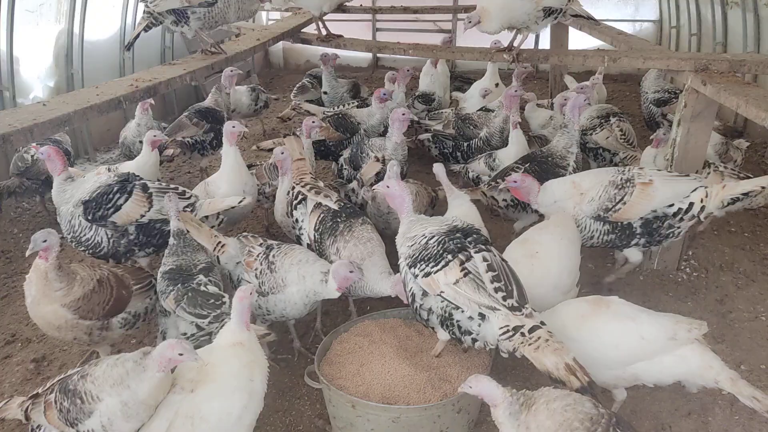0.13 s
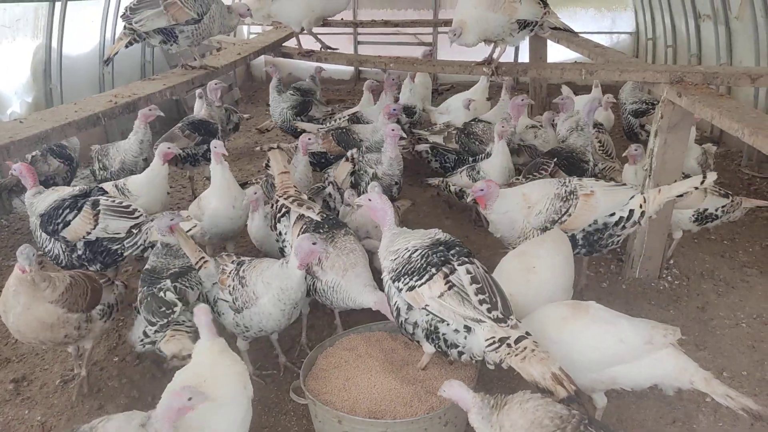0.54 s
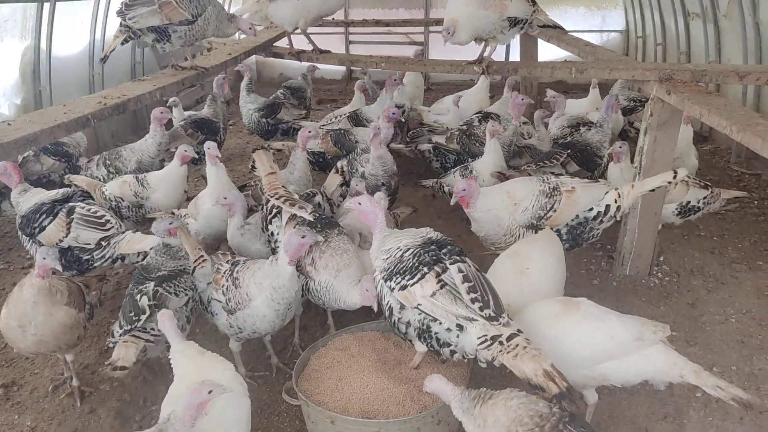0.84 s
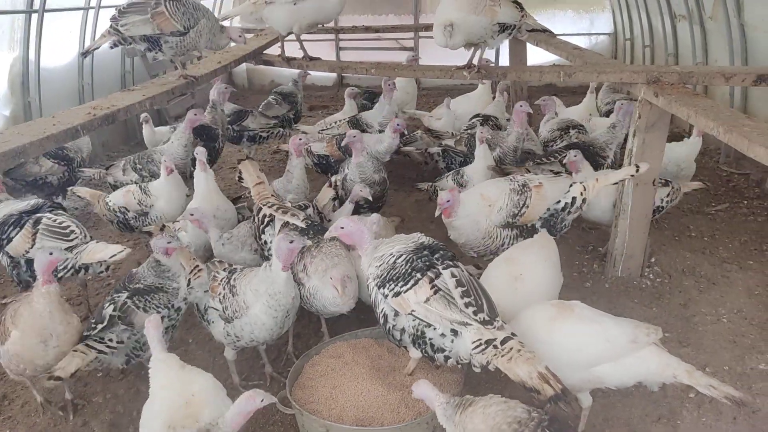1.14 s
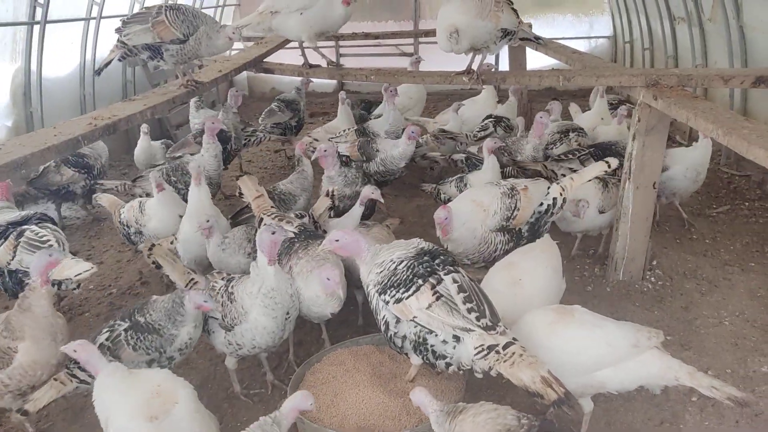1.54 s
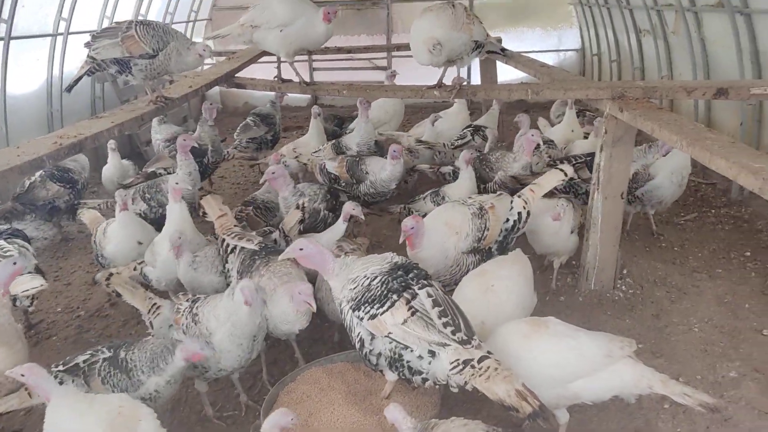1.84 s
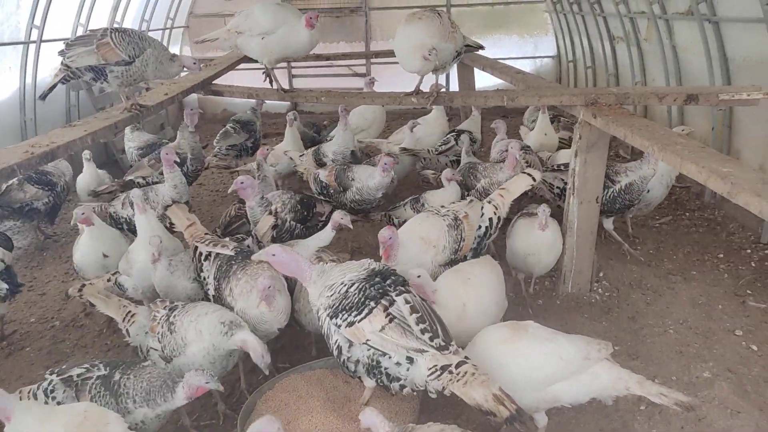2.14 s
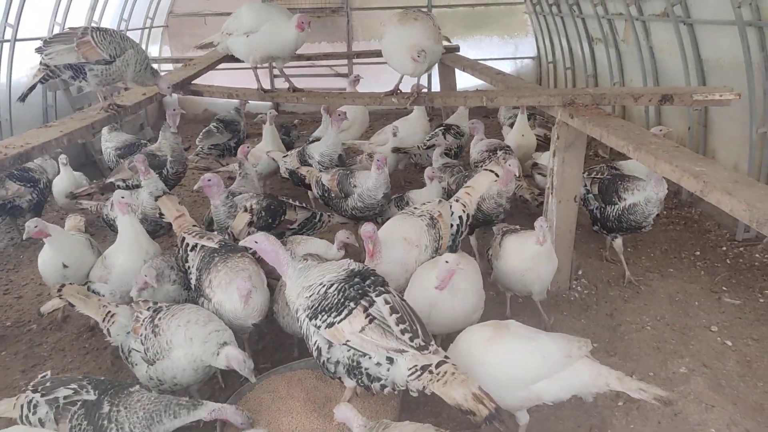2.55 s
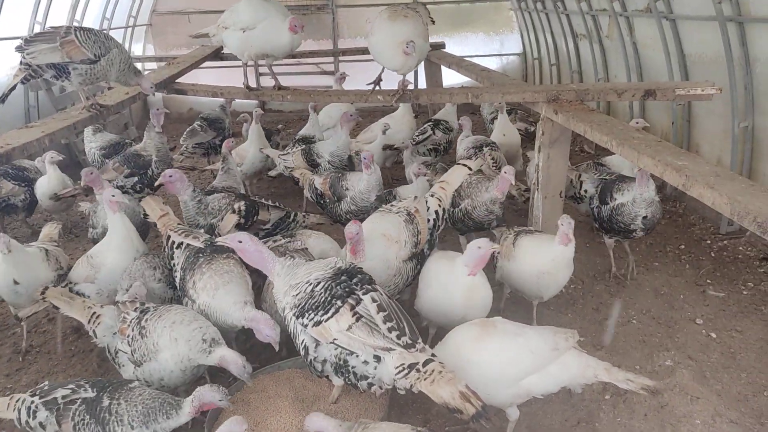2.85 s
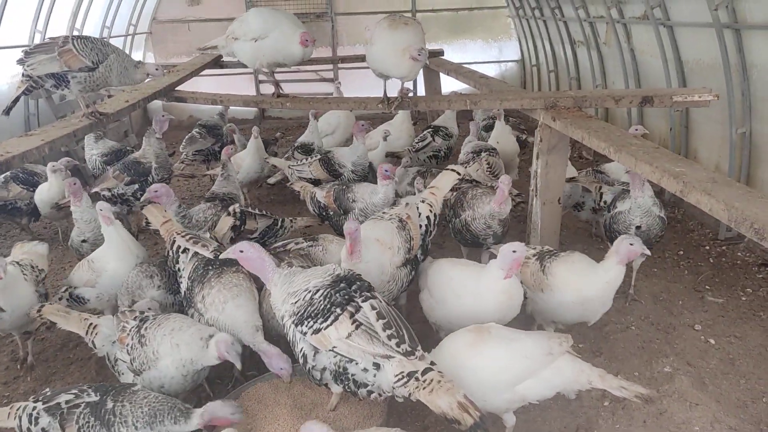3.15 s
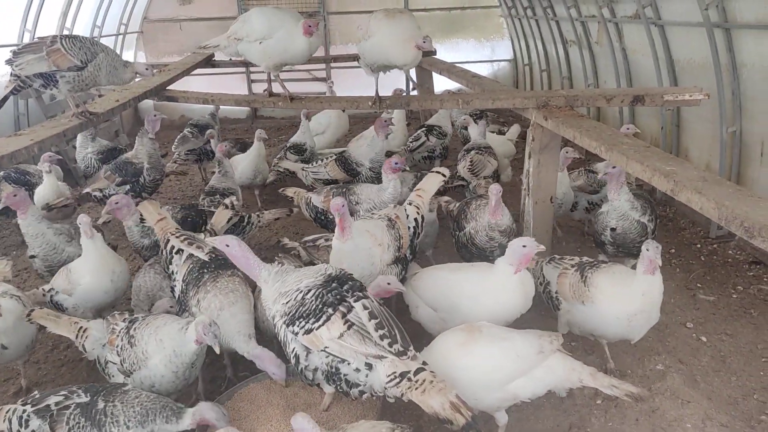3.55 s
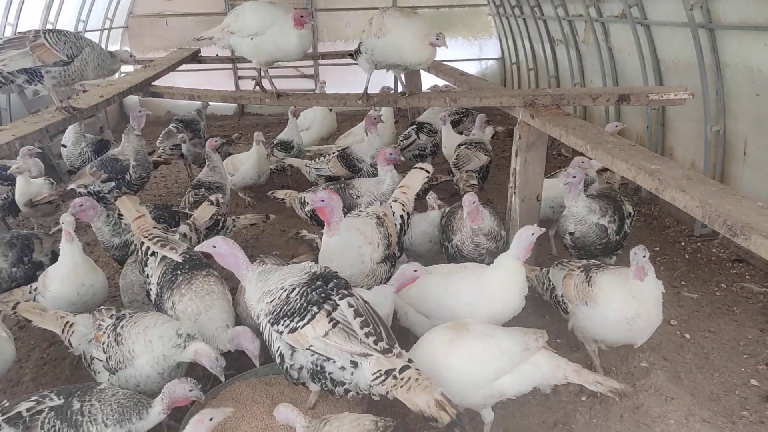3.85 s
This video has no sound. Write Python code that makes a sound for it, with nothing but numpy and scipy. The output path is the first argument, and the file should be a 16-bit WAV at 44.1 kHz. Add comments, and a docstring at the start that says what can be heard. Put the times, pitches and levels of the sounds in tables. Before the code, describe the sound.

A turkey flock calls in clustered, whistle-like hoarse yelps, thinning briefly and then bursting loudly again, over gritty scuffing and faint shuffling in a dirt-floored shed, with later wind thumps on a handheld stereo microphone.

```python
"""Many short overlapping turkey yelps, near and far, in a dirt-floored shed, over feet scuffing the dirt.
Yelps are near-sine glides with six partials; the far flock is a chance crowd of them. Scuffs are swells of
dense grit clicks and the shuffle is patchy noise. Gusts of lumpy low noise and single pushes buffet the two
microphone ports in the second half. The shed echoes birds and scuffs; the right port rings near 8.5 kHz."""
import sys
import numpy as np
from scipy import signal
from scipy.fft import rfft, irfft, next_fast_len
from scipy.io import wavfile

SR = 44100
rng = np.random.default_rng(int(sys.argv[2]) if len(sys.argv) > 2 else 0)


def wrap_up_sound(samples):
    """Save the sound to the file named by the first command line argument, as 16-bit audio."""
    columns = np.atleast_2d(samples).T
    # keep every value between -1 and 1, then stretch to whole-number steps
    tamed = np.clip(columns, -1, 1)
    steps = np.round(tamed * 32767).astype(np.int16)
    wavfile.write(sys.argv[1], SR, steps)


N = 176400   # samples, 4 s


def from_db(db):
    """dB to gain."""
    return 10 ** (np.asarray(db) / 20)


def rms_one(x):
    """Scale to rms 1, over both sides together."""
    return x / np.sqrt(np.mean(x ** 2) + 1e-20)


def in_time(rows):
    """Columns of a breakpoint curve at every sample; the first column is seconds."""
    s, *columns = np.transpose(rows)
    return [np.interp(np.arange(N) / SR, s, c) for c in columns]


def drift(rate_hz):
    """Chance wander of rms 1: white noise through a double one-pole low-pass."""
    r = np.exp(-2 * np.pi * rate_hz / SR)
    wander = signal.lfilter([1], [1, -2 * r, r * r], rng.standard_normal(N + SR))
    return rms_one(wander[SR:])   # the first second lets the filter settle


def colour(x, points):
    """Shape a noise by a spectrum drawn in dB on a log-frequency axis."""
    hz, db = np.transpose(points)
    f = np.maximum(np.arange(N // 2 + 1) * SR / N, 1)
    gain = from_db(np.interp(np.log(f), np.log(hz), db))
    return irfft(rfft(x) * gain, N)


def low(x, hz):
    """Two-pole low-pass."""
    return signal.sosfilt(signal.butter(2, hz, fs=SR, output="sos"), x)


def shuffle():
    """Steady shuffle of the shed: broad patchy noise, shared by both sides in the bass only."""
    # Each row: frequency in Hz, relative level in dB per Hz.
    shuffle_spectrum = [(85, -12), (140, -4.5), (300, -8), (1500, -19.5), (3500, -11.5), (7000, -12.5),
                        (12000, -18), (15000, -16.5)]
    level_db, patch_db, patch_hz = -56, 2.5, 11.0
    white = rng.standard_normal((2, N))
    shared_bass = white + low(white[::-1], 670)
    patches = from_db(level_db + patch_db * drift(patch_hz))
    return patches * rms_one(colour(shared_bass, shuffle_spectrum))


def wind():
    """Wind on the ports: lumpy low noise, mostly each port's own, and single pushes on the right."""
    # Each row: time in seconds, relative level in dB, left over right in dB.
    gusts = [(0, -65.5, -1.5), (1.9, -61, 0.5), (2.1, -55.5, -5), (2.25, -55, -16), (2.32, -60, -2),
             (2.45, -38.5, 30), (2.55, -28, 12.5), (2.68, -35, 4), (2.72, -25, -5.5), (2.78, -40, 4),
             (2.92, -45, -13), (3.05, -34, -28), (3.18, -43, -6), (3.26, -51.5, 4), (3.6, -50.5, -8),
             (3.65, -34.5, -34.5), (3.83, -44.5, 1), (3.9, -35, -23), (4.0, -50.5, 2)]
    # Sharp pushes on the right port. Each row: time in seconds, size in dB before the dip, width in seconds.
    puffs = [(2.728, -9.5, 0.0069), (2.870, -14.5, 0.0043), (3.047, -20.5, 0.0041), (3.364, -18.5, 0.0054),
             (3.653, -15, 0.0032), (3.868, -20, 0.0094)]
    body_hz, lump_db, edge_hz, edge_db = 73.6, 5, 252, -13.5
    lumps = from_db(lump_db * np.array([drift(23), drift(33.7)]))
    white = rng.standard_normal((2, N)) * lumps
    white = white + 0.27 * white[::-1]   # a little of each port in the other
    body = rms_one(low(low(white, body_hz), edge_hz))
    edge = rms_one(low(low(white, edge_hz), edge_hz))
    high_pass = signal.butter(2, 22.0, "high", fs=SR, output="sos")
    rumble = signal.sosfilt(high_pass, body + from_db(edge_db) * edge)

    db, pan_db = in_time(gusts)
    # panning keeps the summed power of the two ports
    pan_gain = 2 / (1 + from_db([-pan_db, pan_db]) ** 2) ** .5
    out = rumble * from_db(db) * pan_gain
    t = np.arange(N) / SR
    for s, push_db, width in puffs:
        z = ((t - s) / width * 2) ** 2
        # a push inside a wider, shallower dip of opposite sign
        out[1] += from_db(push_db) * (np.exp(-z) - 0.29 * np.exp(-z / 9))
    return out


def shed(x):
    """Echo of the shed: ten feedback delays a side that lose treble each pass, smeared by two allpasses."""
    t60_s, dull_hz = 0.24, 3780   # decay in the bass; low-pass inside each loop
    size = next_fast_len(N + SR)
    w = 2 * np.pi * np.arange(size // 2 + 1) / size   # radians per sample
    dull = 1 / (1 + 1j * w * SR / (2 * np.pi * dull_hz))
    response = np.zeros((2, size // 2 + 1), complex)
    for k, lag_s in enumerate(rng.uniform(.008, 0.027, size=20)):
        loop = from_db(-60 * lag_s / t60_s) * dull * np.exp(-1j * w * int(lag_s * SR))
        response[k % 2] += (-1) ** (k // 2) * loop / (1 - loop)
    for lag in (149, 233):   # samples
        delay = np.exp(-1j * w * lag)
        response *= (delay - .6) / (1 - .6 * delay)
    return irfft(rfft(x.mean(axis=0), size) * response, size)[:, :N]


def scuffs():
    """Feet and beaks scuffing the dirt: dense grit clicks that swell and die away, bright and dull."""
    # Each row: peak in seconds, rise in seconds, fall in seconds, bright part in dB, dull part in dB.
    strokes = [(0.038, 0.14, 0.0065, -53, -58), (0.155, 0.042, 0.01, -45.5, -51),
               (0.215, 0.023, 0.018, -55, -48.5), (0.304, 0.022, 0.0075, -49, -49),
               (0.376, 0.041, 0.03, -54, -52.5), (0.611, 0.012, 0.025, -44, -46),
               (0.722, 0.0025, 0.011, -37, -31.5), (0.836, 0.029, 0.011, -56, -56),
               (0.908, 0.003, 0.005, -47, -52), (1.065, 0.0048, 0.012, -42, -45.5),
               (1.154, 0.014, 0.02, -50.5, -43), (1.277, 0.0025, 0.009, -57, -38.5),
               (1.505, 0.012, 0.034, -52, -53), (1.719, 0.0091, 0.019, -44, -48.5),
               (1.951, 0.019, 0.033, -53.5, -56), (2.094, 0.021, 0.029, -56, -49),
               (2.189, 0.0094, 0.0061, -46.5, -49), (2.238, 0.0042, 0.031, -45.5, -50.5),
               (2.35, 0.0099, 0.012, -45, -53), (2.444, 0.025, 0.0099, -48, -65),
               (2.565, 0.012, 0.017, -44.5, -49), (2.615, 0.027, 0.016, -47.5, -53),
               (2.669, 0.021, 0.0022, -52, -49), (2.729, 0.023, 0.014, -52, -48),
               (2.869, 0.027, 0.0031, -47.5, -49.5), (2.903, 0.019, 0.011, -49, -50.5),
               (3.017, 0.018, 0.018, -44.5, -52), (3.082, 0.0076, 0.17, -47.5, -54),
               (3.165, 0.0082, 0.0021, -53, -50.5), (3.26, 0.012, 0.0049, -49, -56),
               (3.401, 0.008, 0.011, -61, -64), (3.492, 0.0082, 0.0069, -52, -60),
               (3.515, 0.0017, 0.036, -43, -50.5), (3.702, 0.015, 0.018, -45, -44.5),
               (3.802, 0.0036, 0.022, -54, -56), (3.879, 0.02, 0.012, -42, -46.5),
               (3.944, 0.0016, 0.014, -53, -47)]
    # Spectra of the two parts. Each row: frequency in Hz, relative level in dB.
    bright_spectrum = [(3000, -25), (6000, -6.5), (8500, 1), (12000, -7), (15000, 0)]
    dull_spectrum = [(120, -4), (330, 7), (560, 2), (3500, 0.5), (5500, -1.5), (8000, -21)]
    grit_per_s, grit_spread_db = 6000, 3.5
    t, bright, dull = np.arange(N) / SR, np.zeros(N), np.zeros(N)
    for s, rise, fall, bright_db, dull_db in strokes:
        # bell-shaped rise, exponential fall
        shape = np.exp(-np.where(t < s, ((s - t) / rise) ** 2, (t - s) / fall / 2))
        bright += from_db(bright_db) * shape
        dull += from_db(dull_db) * shape
    sizes = from_db(grit_spread_db * np.minimum(rng.exponential(1, (2, N)), 5))
    signs = rng.choice([-1, 1], (2, N))
    grit = sizes * signs * (rng.random((2, N)) < grit_per_s / SR)
    bright_grit = rms_one(colour(grit, bright_spectrum))
    dull_grit = rms_one(colour(grit, dull_spectrum))
    return bright * bright_grit + dull * dull_grit


def notes(rows, shimmer_db, shimmer_hz):
    """Each note is a short near-sine glide with six partials and its own hoarseness, placed by level and lead."""
    attack_s, attack_share, release_s = .012, .6, .007   # short notes rise within this share of their length
    scoop, scoop_s = 0.0734, 0.0055   # each note scoops up to pitch by this share
    jitter, jitter_hz = .007, 107   # share of pitch, speed of its wander
    arch_db = 3.5   # sag at both ends
    upper_lead = 0.58   # share of the lead kept by upper partials
    # fall per partial above the third, steeper where the second partial is weak
    upper_fall_db, fall_per_db = 4.5, 0.61
    out, wobble, shimmer = np.zeros((2, N)), drift(jitter_hz), drift(shimmer_hz)
    offsets = rng.integers(N, size=len(rows))   # each note reads its own stretch of hoarseness
    for (s, length, hz0, hz1, db, db2, db3, pan_db, lead_ms), own in zip(rows, offsets):
        attack = min(attack_s, attack_share * length)
        i = np.arange(int((s - attack) * SR), int((s + length + 3 * release_s) * SR))
        i = i[(i >= 0) & (i < N)]
        t = i / SR - s   # zero where the attack ends

        glide = hz0 + (hz1 - hz0) * np.clip(t / length, 0, 1)
        hz = glide * (1 - scoop * np.exp(-(t + attack) / scoop_s) + jitter * wobble[i - own])
        phase = 2 * np.pi * np.cumsum(hz) / SR

        rise = np.sin(np.pi / 2 * np.clip(1 + t / attack, 0, 1)) ** 2
        release = np.exp(-(np.maximum(t - length, 0) / release_s) ** 2)
        sag_db = arch_db * np.minimum((2 * t / length - 1) ** 2, 2)
        throb = shimmer[i - own]
        level_db = db - sag_db + shimmer_db * (throb - throb.mean())
        swell = rise * release * from_db(level_db) * np.sqrt(2)   # rms to sine peak

        fall_db = upper_fall_db - fall_per_db * db2
        levels = from_db([0, db2, *(db3 - fall_db * np.arange(4))])
        for side, sign in enumerate((.5, -.5)):
            lead = sign * 2 * np.pi * hz * lead_ms / 1000
            voice = sum(g * np.sin((k + 1) * phase + (1 + k * upper_lead) * lead)
                        for k, g in enumerate(levels))
            out[side, i] += swell * from_db(sign * pan_db) * voice
    return out


def far_flock():
    """The rest of the flock, further off: chance hoarse notes from all round under one level curve."""
    # Each row: time in seconds, level in dB.
    flock_level = [(0, -59.5), (.1, -47.5), (.27, -43.5), (.58, -36.5), (.64, -50.5), (.88, -64.5),
                   (1.0, -44.5), (1.2, -47), (1.35, -58), (1.55, -45), (1.75, -53), (1.9, -70),
                   (2.2, -50.5), (2.4, -45), (2.68, -39), (2.84, -62.5), (3.2, -53), (3.4, -59),
                   (3.57, -85), (3.68, -38.5), (4.0, -57.5)]
    notes_per_s, low_hz, high_hz, note_s = 140, 609.3, 1377.6, 0.02
    second_db, third_db = -3.5, -14   # partials against the first
    rasp_db, rasp_hz = 4.5, 132   # fast chance throb of hoarse far voices
    rows = []
    for when, pitch, size, bend, loud, side, lead in rng.random((int(notes_per_s * N / SR), 7)):
        hz = low_hz * (high_hz / low_hz) ** pitch
        rows.append((when * N / SR, note_s * (0.41 + size), hz, hz * (.92 + 0.166 * bend), -8 * loud,
                     second_db, third_db, 8 * side - 3, 0.84 * lead - .4))
    return from_db(in_time(flock_level)[0]) * rms_one(notes(rows, rasp_db, rasp_hz))


def near_yelps():
    """The near birds: each yelp has its own glide, partials and place, with a mild hoarse throb."""
    # Each row: end of attack in seconds, length from there in seconds, first Hz, last Hz, mid-note level in dB,
    # 2nd and 3rd partial in dB against the first, left over right in dB, left lead in ms.
    yelps = [(0.084, 0.015, 755, 785, -41, -4.5, -10, 4.5, 0.27),
             (0.108, 0.034, 1226, 1240, -48, -15, -15, 1, 0.077),
             (0.15, 0.055, 1336, 1172, -37, -18, -21, 4, 0.3),
             (0.159, 0.089, 1089, 957, -40.5, -18, -14.5, -2, 0.12),
             (0.21, 0.057, 1420, 1398, -49, -25, -30, -4, 0.16),
             (0.228, 0.032, 1083, 1105, -31.5, -13, -23, 6.5, -0.33),
             (0.24, 0.115, 1192, 1213, -53, 3.5, -22, 0, 0.13),
             (0.257, 0.022, 902, 740, -44, -18, -26, -2, 0.18),
             (0.32, 0.049, 1072, 986, -44, -14, -22, -2, -0.13),
             (0.33, 0.011, 1028, 1020, -39, -17, -28, 7, 0.27),
             (0.357, 0.0082, 1000, 1080, -36, -24, -25, 0, 0.05),
             (0.365, 0.024, 1163, 1190, -30.5, -28, -36, 4.5, 0.42),
             (0.405, 0.03, 1094, 976, -36, -17, -22, 1, -0.079),
             (0.434, 0.0076, 1173, 1200, -23.5, -20, -28, 0, -0.31),
             (0.42, 0.037, 791, 887, -39.5, 1, -16, 3.5, 0.23),
             (0.488, 0.013, 788, 825, -33.5, 2.5, -21, -2, 0.27),
             (0.503, 0.025, 843, 883, -36, -0.5, -23, 1, 0.3),
             (0.53, 0.0088, 836, 770, -40.5, -7, -30, 1, -0.019),
             (0.53, 0.055, 687, 644.5, -37, -11, -17, -4, 0.01),
             (0.569, 0.043, 1130, 1040, -37, -12, -33, 4, 0.25),
             (0.648, 0.011, 667, 679, -32, -21, -15.5, -1, 0.01),
             (0.709, 0.016, 661, 652, -33, -16, -7.5, -1, 0.1),
             (0.739, 0.0099, 642, 753, -42, -25, -5, 6, -1.2),
             (0.777, 0.015, 665, 737, -30, -18.5, -10.5, -1, -0.15),
             (0.931, 0.051, 756.7, 743, -40, -1, -14, -8, -0.29),
             (0.97, 0.036, 1400, 1440, -44.5, -37, -25, 1, -0.18),
             (0.988, 0.008, 1120, 1174, -36, -25, -34, 2, 0.27),
             (1.008, 0.038, 675, 730, -52, -12, -3, 5, 0.1),
             (1.063, 0.018, 743, 820, -34.5, -6.5, -28, -4, 0.21),
             (1.114, 0.042, 1067, 1143, -45.5, 0.5, -28, 6, 0.17),
             (1.146, 0.012, 764, 848, -32, -4.5, -19, 4, 0.14),
             (1.155, 0.019, 1290, 1324, -38.5, -15, -31, 0, 0.27),
             (1.222, 0.022, 740, 754, -50, -6, -10, 2, 0.1),
             (1.378, 0.014, 682, 955, -35.5, -10.5, -19, 2.5, 0.2),
             (1.39, 0.064, 963, 846, -37, -8.5, -18.5, -7.5, 0.45),
             (1.464, 0.092, 855, 797, -40, 4, -18, 1, -0.24),
             (1.485, 0.034, 799, 745, -37, -0.5, -11, 1, 0.022),
             (1.518, 0.033, 1130, 1082, -46, -5, -10, 5, 0.53),
             (1.527, 0.036, 1237, 1280, -42, -14, -30, 3.5, 0.41),
             (1.548, 0.021, 882, 1050, -37.5, -26, -20, -5, -0.15),
             (1.635, 0.04, 635, 930, -45.5, -14, -30, 0, 0.038),
             (1.678, 0.025, 966, 1030, -33, -9.5, -13, 3, 0.22),
             (1.691, 0.0056, 1400, 1530, -37, -20, -7, 5, -0.14),
             (1.73, 0.0079, 960, 1070, -45, -23, -20, 8, 0.055),
             (1.945, 0.018, 1030, 1217, -52.5, -13, -23, -6, 0.13),
             (1.955, 0.04, 628, 578, -56.5, -18, -8, -3, 0.18),
             (1.962, 0.022, 1200, 1140, -48, -22, -16, 8, 0.2),
             (2.0, 0.065, 1132, 1110, -39.5, -31, -31, 8, 0.19),
             (2.035, 0.055, 646, 615, -46, -13, -21, -3.5, 0.26),
             (2.065, 0.042, 1135, 1085, -38, -28, -36, -2, 0.23),
             (2.095, 0.021, 995, 1050, -44.5, -4.5, -24, 12.5, 0.69),
             (2.101, 0.088, 814, 795, -38, 3.5, -9, 4, -0.18),
             (2.17, 0.012, 1027, 1026, -33, -9, -17.5, -5, 0.01),
             (2.191, 0.019, 1029, 1094, -36.5, -12, -21, 11, 0.22),
             (2.218, 0.033, 1168, 1301, -31.5, -10.5, -16.5, 6, 0.31),
             (2.317, 0.026, 663, 637, -36, -16, -18.5, -4, 0.027),
             (2.395, 0.026, 1037, 1337, -37, -26, -24, 4.5, 0.58),
             (2.449, 0.035, 1076, 1076, -36.5, -5, -21, 7.5, -0.32),
             (2.475, 0.021, 615, 613, -40.5, -10, -3.5, 0, -0.21),
             (2.493, 0.033, 1376, 1320, -37.5, -30, -15, 9, -0.37),
             (2.508, 0.026, 814, 842, -34.5, 0.5, -20, 10, 0.23),
             (2.529, 0.038, 1272, 1074, -30.5, -18, -27, 0, 0.31),
             (2.558, 0.023, 782, 699, -35.5, -14, 0, 1.5, -0.15),
             (2.58, 0.014, 890, 854, -32.5, -4, -12, 5, -0.24),
             (2.589, 0.013, 1240, 1390, -29.5, -25, -33, 6.5, -0.45),
             (2.61, 0.019, 947, 960, -38.5, -26, -30, -12, -0.098),
             (2.648, 0.012, 877, 901, -25, -1.5, -21, 7.5, -0.16),
             (2.661, 0.014, 1235, 1400, -25.5, -38, -30, 6.5, -0.37),
             (2.676, 0.012, 902, 860, -37, -6, -31, -2, 0.37),
             (2.706, 0.0049, 870, 910, -26, 1.5, -18, 7, -0.18),
             (2.721, 0.0071, 1300, 1450, -26.5, -26, -25, 7, 0.27),
             (2.736, 0.043, 821, 932, -37, -4.5, -20, 5, -0.18),
             (2.775, 0.01, 1316, 1440, -28.5, -20, -28, 5, -0.2),
             (2.859, 0.023, 1084, 1062, -25.5, -15.5, -30, 3.5, 0.14),
             (2.909, 0.018, 1083, 1088, -50, -11, -42, -1, -0.2),
             (2.939, 0.03, 867, 910, -39.5, -29, -39, -6.5, 0.44),
             (2.972, 0.12, 919.6, 900.5, -41.5, -42, -29, -3.5, 0.19),
             (3.044, 0.11, 946, 987, -39, -42, -19.5, -3, 0.33),
             (3.14, 0.026, 889, 770, -48.5, -26, -12, 4, -0.065),
             (3.17, 0.011, 603, 638, -37.5, -3.5, -28, 0, 0.39),
             (3.512, 0.16, 1022, 988, -49.5, -14, -28, -7, -0.17),
             (3.59, 0.028, 576, 827, -38.5, -16, -30, 1, -0.14),
             (3.615, 0.04, 862, 1005, -37.5, -3, -18, 3.5, -0.21),
             (3.644, 0.018, 1100, 1144, -30, -8, -30, -5.5, -0.31),
             (3.668, 0.016, 773, 950, -35, -15, -20, 5, 0.13),
             (3.691, 0.026, 1371, 1399, -25.5, -21, -27, 4, -0.23),
             (3.69, 0.016, 643, 686, -32, -8, -25, 6, 0.41),
             (3.714, 0.018, 711, 749, -20.5, -5, -15.5, 2, 0.23),
             (3.706, 0.04, 960, 950, -40, -9, -17.5, 10, -0.46),
             (3.727, 0.092, 1147, 1128, -42.5, -16, -19, 2, -0.3),
             (3.739, 0.021, 892, 898, -33.5, -22, -31, -14, 0.33),
             (3.769, 0.038, 947, 975, -35, -21, -31, 13, 0.62),
             (3.772, 0.017, 1379, 1405, -38.5, -13, -7.5, 8.5, -0.16),
             (3.773, 0.017, 632, 790, -26, -8.5, -21.5, -1, 0.18),
             (3.789, 0.02, 1223, 1205, -37, -14, -31, 8, 0.34),
             (3.804, 0.013, 723, 665, -37, -13, -26, 0, 0.29),
             (3.828, 0.0347, 1058, 1124, -42.5, -12, -32, 7, 0.014),
             (3.828, 0.019, 519, 517, -43.5, 8, -18, 0, 0.36),
             (3.937, 0.013, 1483, 1216, -40, -20, -32, 0, -0.084),
             (3.948, 0.044, 1210, 1146, -35.5, -13, -32, 5, 0.176)]
    return notes(yelps, shimmer_db=2.8, shimmer_hz=93.0)


def scene():
    """Birds and scuffs with the shed's echo, shuffle and wind."""
    near = near_yelps() + far_flock() + scuffs()
    echo = from_db(-12) * shed(near)
    return near + echo + shuffle() + wind()


def record(dry):
    """The right port resonates in the treble, the left dips in the same band; the top is cut on both."""
    port_hz, width_hz, right_db, left_db = 8430, 1000, 16, -8
    cutoff_hz = 15150   # fully cut, by 70 dB, from here up
    r, w = np.exp(-np.pi * width_hz / SR), 2 * np.pi * port_hz / SR
    ring = signal.lfilter(np.array([1, 0, -1]) * (1 - r * r) / 2, [1, -2 * r * np.cos(w), r * r], dry)
    left = dry[0] + (from_db(left_db) - 1) * ring[0]
    right = dry[1] + (from_db(right_db) - 1) * ring[1]
    top_cut = signal.cheby2(12, 70, cutoff_hz, fs=SR, output="sos")
    return signal.sosfilt(top_cut, [left, right])


dry = scene()
out = record(dry)
wrap_up_sound(out)
```